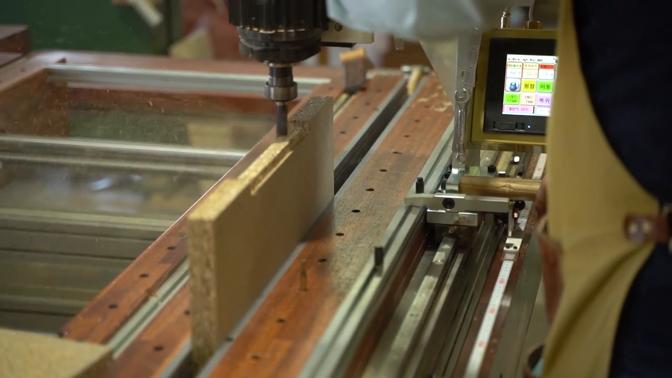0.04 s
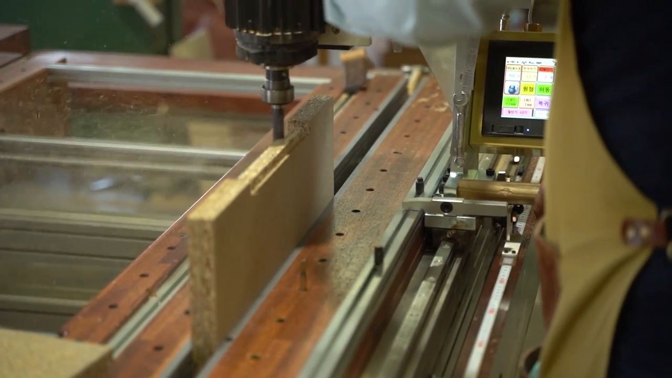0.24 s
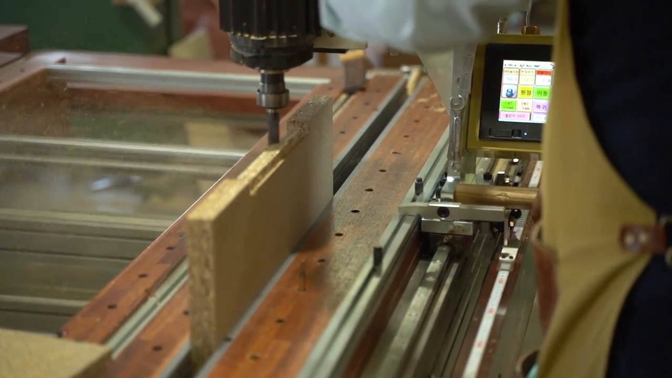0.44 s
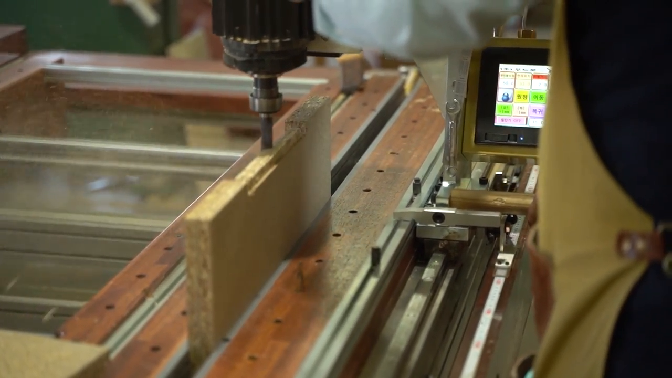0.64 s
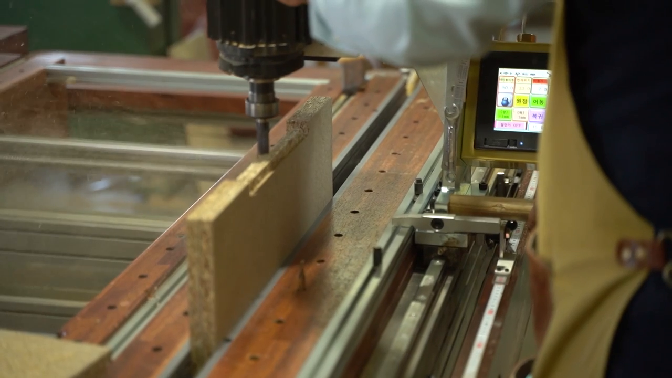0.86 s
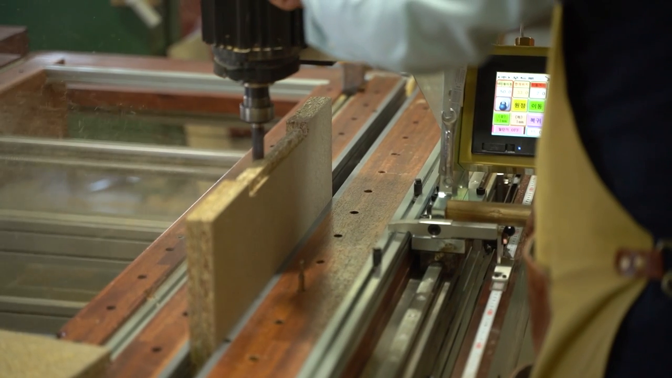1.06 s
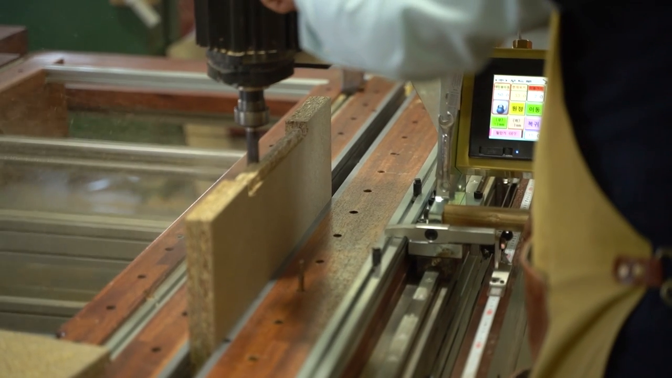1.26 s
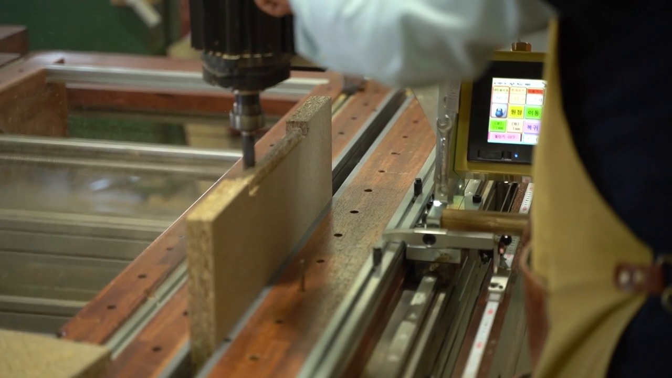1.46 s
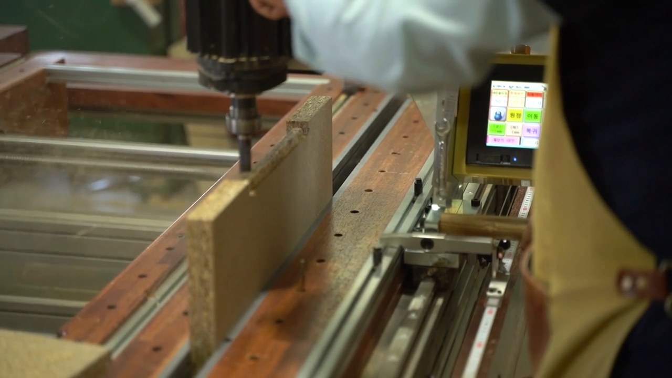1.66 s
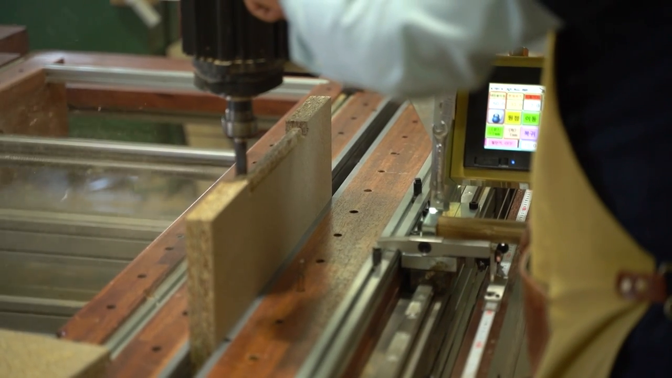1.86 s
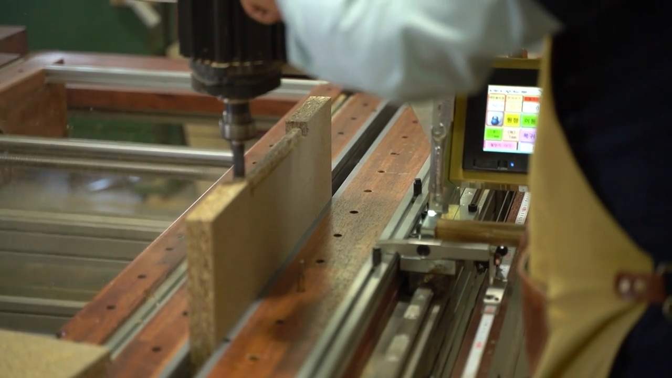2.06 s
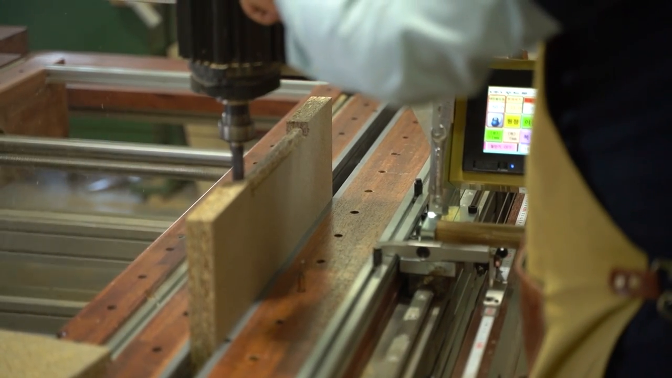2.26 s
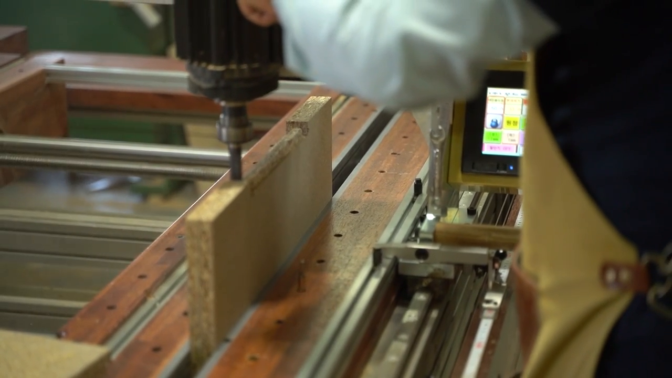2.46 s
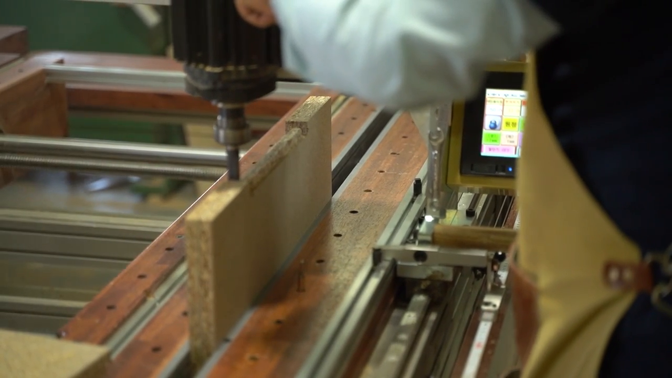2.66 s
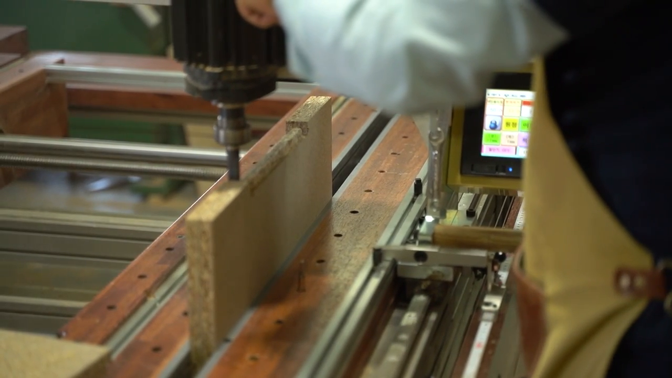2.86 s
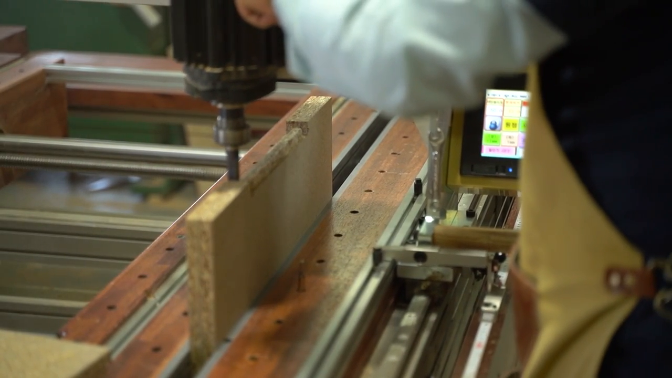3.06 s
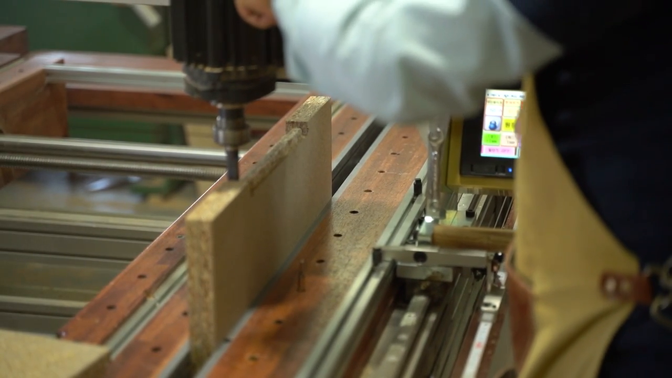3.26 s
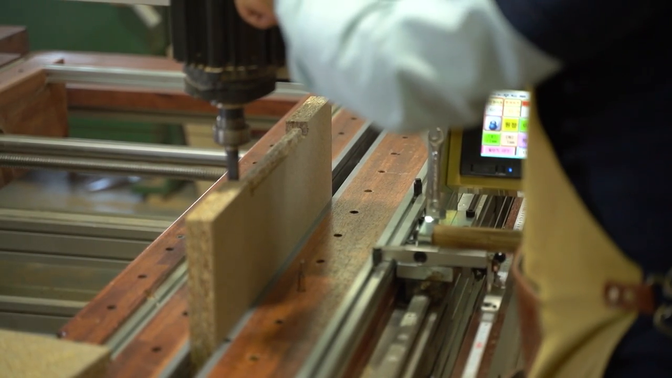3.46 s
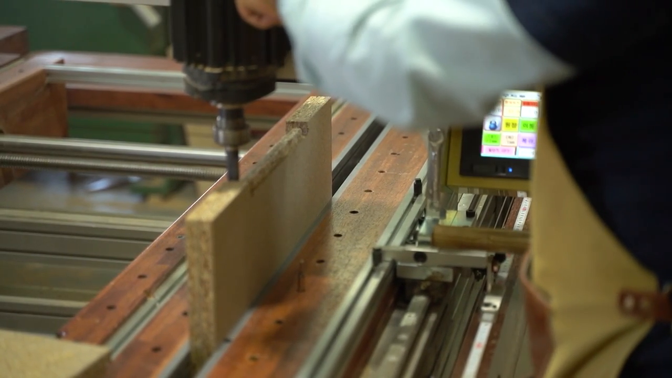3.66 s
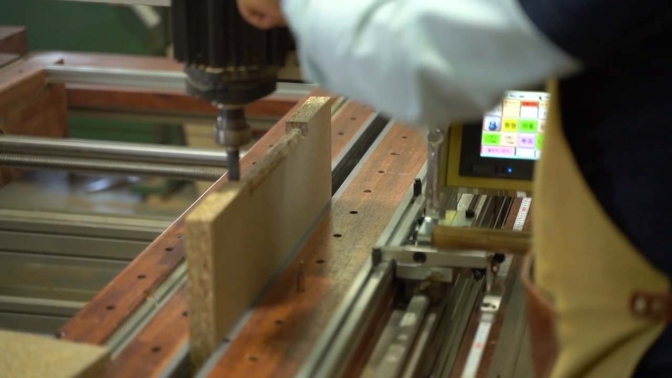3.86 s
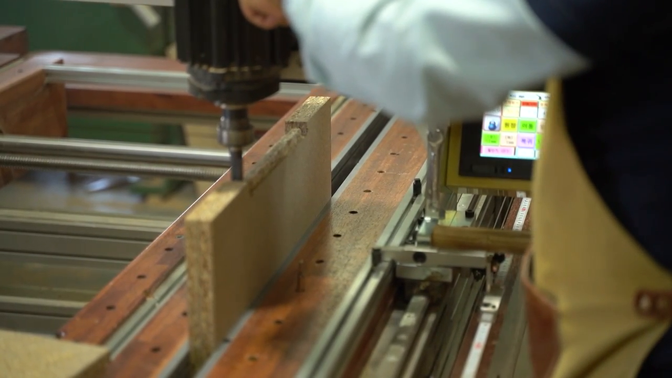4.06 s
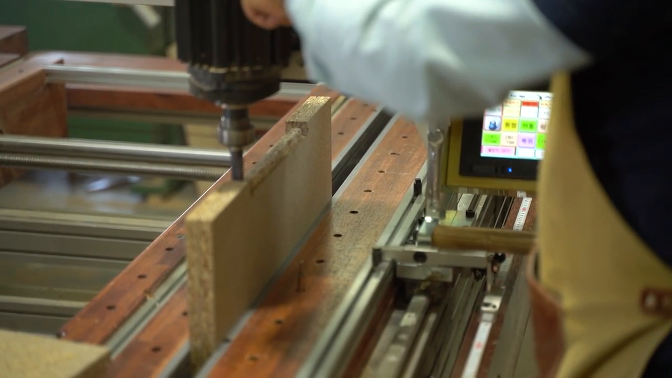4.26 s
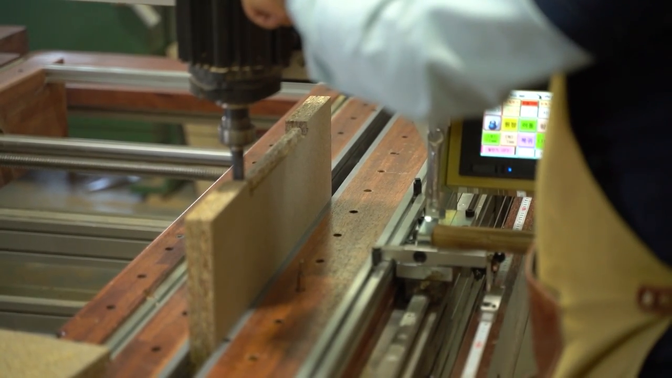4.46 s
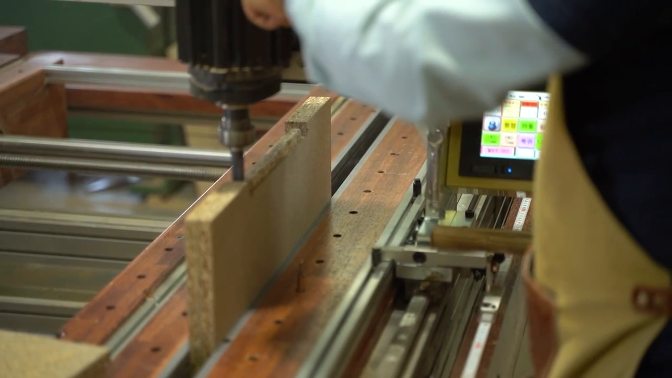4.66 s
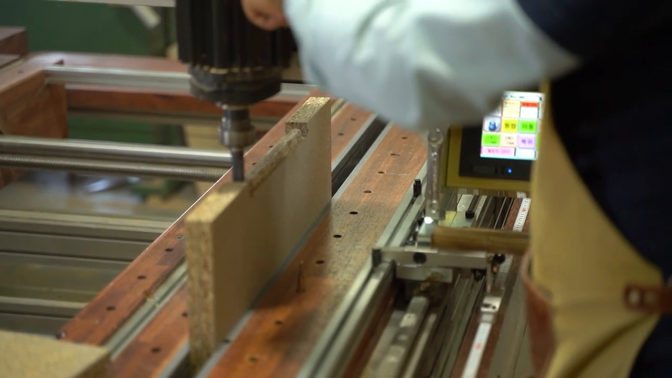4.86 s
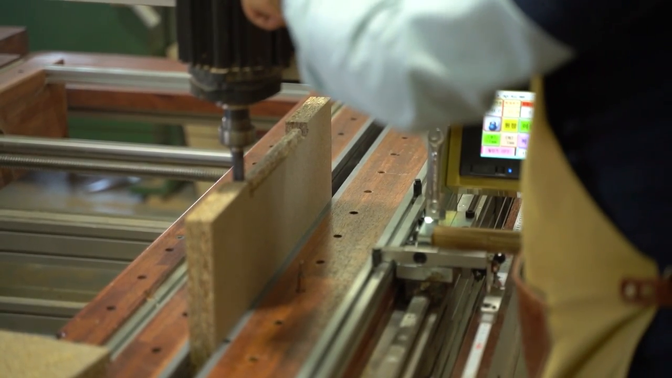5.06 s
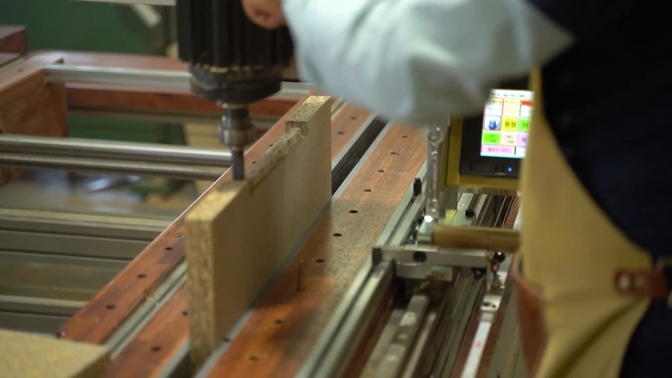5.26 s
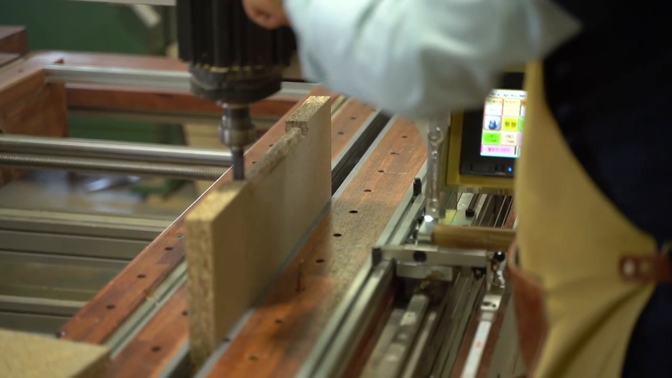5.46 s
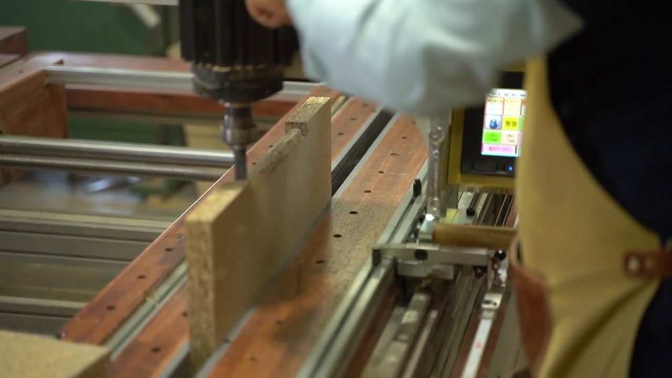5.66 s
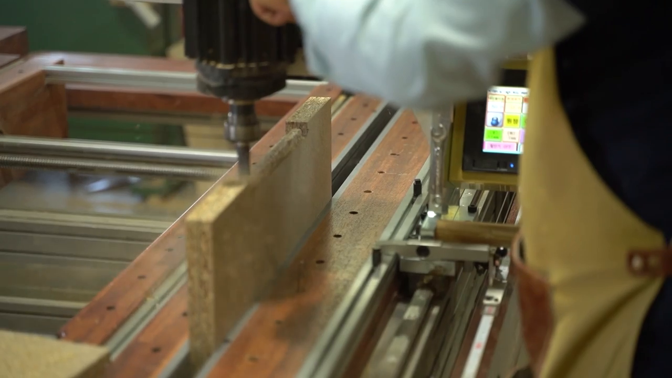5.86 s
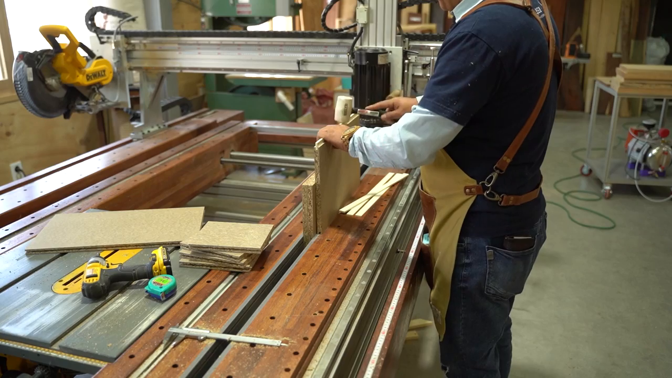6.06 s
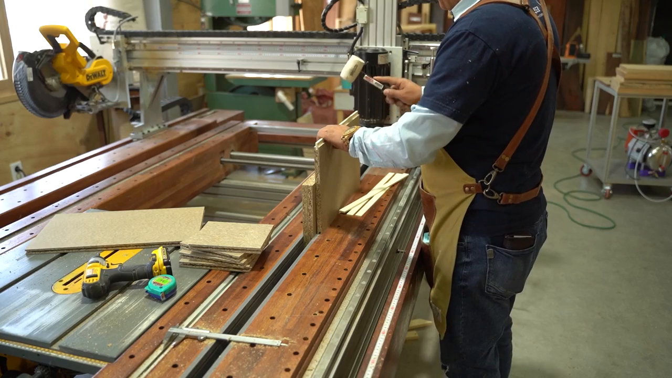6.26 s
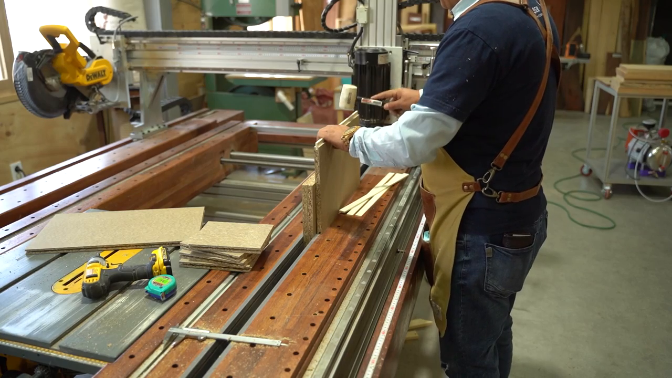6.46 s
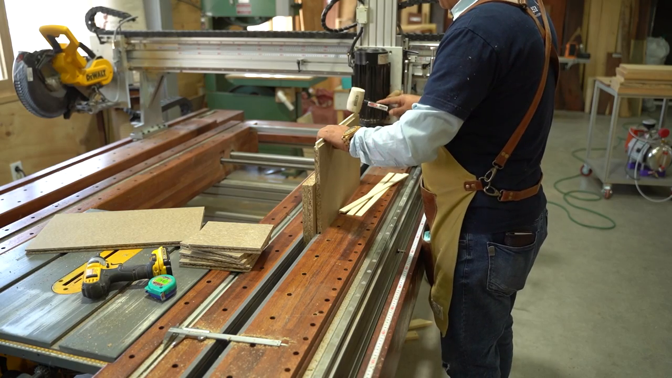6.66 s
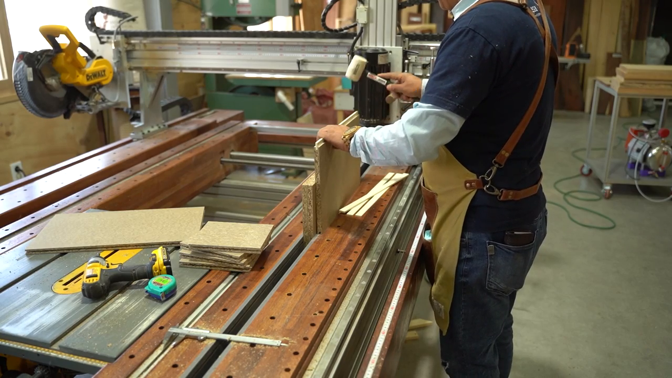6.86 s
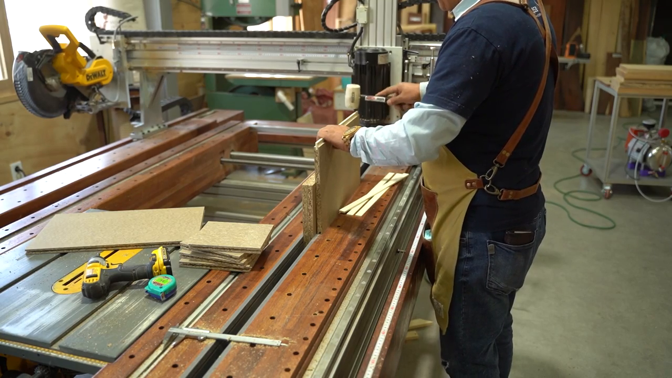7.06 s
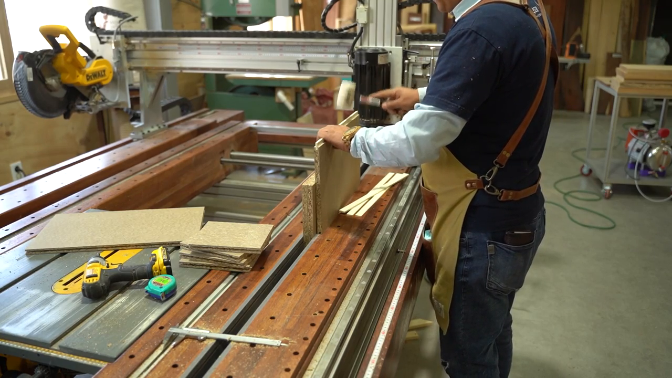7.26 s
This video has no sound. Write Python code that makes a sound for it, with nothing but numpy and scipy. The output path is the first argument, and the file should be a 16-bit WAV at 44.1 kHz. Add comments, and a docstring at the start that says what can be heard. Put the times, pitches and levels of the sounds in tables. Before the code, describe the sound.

A router whines with rushing air as it cuts a board, then a mallet knocks four times on a wooden panel in a quiet workshop.

```python
"""A router cutter whines through a board, close to a stereo pair of microphones in a workshop.
Its four contacts a turn make the whine; the motor sings at multiples of its speed; air rushes from the fan.
After six seconds the scene breaks off. In the same shop, now quiet, an earlier knock dies away,
then a mallet knocks four times on an upright wooden panel: a crack, ringing modes, a short room tail."""
import sys
import numpy as np
from scipy import signal
from scipy.io import wavfile

SR = 44100
rng = np.random.default_rng(int(sys.argv[2]) if len(sys.argv) > 2 else 0)


def dump(signal):
    """Clip the signal to [-1, 1] and save it as 16-bit WAV at the path in sys.argv[1]."""
    limited = np.clip(np.atleast_2d(signal).T, -1, 1)
    pcm = np.round(limited * 32767).astype(np.int16)
    wavfile.write(sys.argv[1], SR, pcm)


N = 322371
T = np.arange(N) / SR
COARSE = np.arange(0, N, 40)
EARS = np.array([[1], [-1]])   # left, right
BREAK_S = 6.012

# Spindle speed, a little lower under load: time_s, turns_hz
SPEED = [(0, 297.3), (1.5, 297.4), (2.0, 297.7), (2.8, 298.7), (3.9, 298.8), (4.1, 298.4), (5.3, 298.7),
         (5.6, 297.9), (6.02, 297.0)]
# The motor's song at six times the spindle speed: time_s, level_db
MOTOR_SONG = [(0, -48), (.6, -47.5), (1.0, -46), (1.5, -57), (1.9, -46), (2.6, -47.5), (2.8, -40),
              (3.2, -44), (3.95, -39.5), (4.08, -45.5), (4.35, -40.5), (4.6, -39.5), (5.1, -39.5),
              (5.48, -39.5), (5.6, -47), (6.0, -54.5)]
# Spindle orders that come and go: order, start_s, end_s, level_db
ORDER_SWELLS = [(3, -0.5, 1.67, -54), (3, 4.0, 4.15, -49.5), (3, 4, 5.85, -56), (5, 0, 1.05, -47),
                (5, 3, 2.4, -55), (10, 1.5, 4.0, -54), (10, 4.2, 4.1, -52)]
def spindle(groove, graze):
    """The router, close by: motor orders, unbalance once a turn, and the cutter on a jittering turn."""
    (turns_hz,), (motor_db,) = in_time(SPEED), in_time(MOTOR_SONG)
    jittery = 2 * np.pi * np.cumsum(turns_hz + 0.447 * drift(13.73)) / SR
    steady = 2 * np.pi * np.cumsum(turns_hz) / SR
    unbalance_db = -65 + 6 * groove
    out = tone(6 * steady, 1400, from_db(motor_db), rough=0.23, flutter_hz=18)
    out += tone(steady, 298, from_db(unbalance_db), rough=0.094, flutter_hz=12)
    for order in sorted({row[0] for row in ORDER_SWELLS}):
        gain = sum(from_db(db) * span(start, end) for k, start, end, db in ORDER_SWELLS if k == order)
        out += tone(order * steady, 298 * order, gain, rough=0.48, flutter_hz=6.9)
    return out + cutter(jittery, groove, graze)


# Whine at the board: order (rounded for the pitch), groove_db, graze_db
WHINE = [(4.2, -41.5, -45), (7.8, -41, -55), (12.3, -43, -37), (15.9, -44.5, -52), (20, -48.5, -46),
         (24, -47.5, -56), (28, -52, -47), (32, -60, -69), (36, -67, -73), (40, -60.5, -69), (44, -63, -67),
         (48, -64, -72)]
# Slow swells in the groove: time_s, order4_db, order8_db, order12_db, order16_db, order20_db
WHINE_SWELLS = [(0, 5, 6, -4, -9, -3), (.2, 2, 3.5, 3.5, 4.5, -1), (.4, 2, -1, -1.5, -3, -2),
                (.6, -4.5, -4, -0.5, -1, 3.5), (.75, -7, 4, -4, -3, 1), (.95, -5, -2, -2.5, 0, 1),
                (1.1, -5, -7, -6.5, 5.5, 6), (1.3, -3, -1.5, -5, -0.5, 2), (1.55, 3, 4.5, -3.5, -5, -3),
                (1.7, 3.5, -4, -7, -7, 0), (1.9, 5.5, -1, -3, -4, -1), (2.1, -2, -1.5, 0, -5, -8),
                (2.32, -2.5, 2, -5.5, -3, 5.5), (2.6, -9.5, -5, 3.5, 0.5, 0), (5.6, -4.5, -6, -5, 6.5, 6),
                (5.72, 0, 0, 1, 1, 1), (5.78, -8, -7, 1, 8, 9), (5.84, 2, -5.5, 5, -2, 7),
                (6.0, 4.5, -2, 1, 1, 0)]
def cutter(turn, groove, graze):
    """Four contacts a turn give wavering orders, rougher higher up; a free cutter hardly whines."""
    out, free = 0, 1 - groove - graze
    swells_db = in_time(WHINE_SWELLS) + [0] * len(WHINE)
    for (order, groove_db, graze_db), swell_db in zip(WHINE, swells_db):
        in_wood = groove * from_db(groove_db + swell_db) + graze * from_db(graze_db)
        gain = (in_wood + free * from_db(groove_db - 14)) * from_db(2.3 * drift(7.5))
        out += tone(round(order) * turn, 298 * order, gain,
                    rough=.08 + .014 * order, flutter_hz=30 + 1.5 * order)
    return out


# Cutter in the wood: start_s, enter_s, end_s, leave_s, depth (0-1), grazing (0 or 1)
PASSES = [(-1, .05, 2.7, .08, 1, 0), (4.013, .012, 4.14, .1, 1, 1), (4.34, .03, 4.52, .36, .8, 1),
          (5.52, .1, 7, .05, 1, 0)]
def cutter_contact():
    """How deep the cutter sits in the groove and how hard it grazes the edge, both 0-1."""
    grip = np.zeros((2, N))
    for start, enter, end, leave, depth, grazing in PASSES:
        grip[grazing] += depth * span(start, end, enter, leave)
    return grip


# Tones beside the whine: pitch_hz, start_s, end_s, level_db, flutter_hz
FEED_TONES = [(148, 0, 0.28, -63, 6), (312, 0.31, 1.31, -53.5, 12), (214, 1.1, 2.22, -68, 8.3),
              (2570, 0.49, 2.35, -114, 1.7), (3878, .3, 1.5, -54, 7.5), (2082, 0.89, 2.6, -66.5, 3)]
def feed():
    """Tones of steady pitch swell and fade during the first pass."""
    return sum(tone(2 * np.pi * hz * T, hz, from_db(db) * span(start, end), 0.37, flutter_hz)
               for hz, start, end, db, flutter_hz in FEED_TONES)


# Colour of the air, cutting and running free: frequency_hz, relative_db
RUSH_IN_WOOD = [(20, -36), (60, -37.5), (150, -25), (300, -21), (500, -15.5), (650, -11.5), (1100, -6.5),
                (1800, -3.5), (3000, -6.5), (4300, -3), (5400, -13), (7500, -6), (9500, -38), (12000, -26),
                (16000, -36)]
RUSH_FREE = [(20, -45), (60, -29.5), (150, -35), (300, -20.5), (500, -16.5), (650, -14.5), (1100, -7.5),
             (1800, -4.5), (3000, -7), (5000, -9.5), (7500, -10.5), (9500, -21.5), (12000, -62), (16000, 5)]
# Resonances of the fan duct: pitch_hz, width_hz, level_db
FAN_DUCT = [(673.3, 76, -46), (579, 20, -68)]
# How alike the router is at the two microphones: frequency_hz, likeness (0-1)
ROUTER_LIKENESS = [(60, 1.0), (150, 1.0), (380, 0.98), (950, 0.68), (1500, 0.5), (2380, 0.095),
                   (4500, 0.18), (8500, 0.44), (15000, 0.22)]
# Its lean between them: frequency_hz, left_over_right_db
ROUTER_BALANCE = [(60, 0), (150, -0.5), (380, 0), (950, .5), (2380, 0.5), (5000, 1.1), (8500, 2),
                  (15000, 2.7)]
def fan_rush(cutting):
    """Patchy air noise; it grows, changes colour and resounds more in the duct as the cutter comes free."""
    first_end, second_start = PASSES[0][2], PASSES[1][0]
    groove_opening = 0.7 * T / first_end * (2 * T < first_end + second_start)   # first pass only
    opened = 1 - cutting * (1 - groove_opening)
    opened = np.interp(T - 0.034, T, opened)   # the air follows the cutter a little late
    free_share = 0.17 + 0.4 * opened
    out, shared_db = 0, 0.5 * drift(7.9)
    for hz, band in bands(ROUTER_LIKENESS, N):
        colour_db = (1 - free_share) * at_hz(RUSH_IN_WOOD, hz) + free_share * at_hz(RUSH_FREE, hz)
        out += from_db(colour_db + shared_db + 0.27 * drift(60)) * pan(at_hz(ROUTER_BALANCE, hz)) * band
    out = from_db(-35.5 + 4 * opened) * rms_one(out)
    for hz, width_hz, db in FAN_DUCT:
        air = rng.standard_normal(N) + 0.19 * rng.standard_normal((2, N))
        out += from_db(db) * (0.21 + 0.85 * free_share) * narrow(air, hz, width_hz)
    return out


# Blows near the microphones, the first before the break: start_s, strength_db, crack_db, thud_db, pan_db
KNOCKS = [(5.79, -8.5, 8.5, -3, 0), (6.1003, -8.5, 7, -2, 0.5), (6.3990, -12, 9.5, 2, 0.5),
          (6.7220, -14.5, 15.5, 6.5, 0.5), (7.0400, -8.5, 8, 1.5, 0.5)]
# Modes of the wooden panel: pitch_hz, relative_db, t60_s
PANEL_MODES = [(102, -16, 0.072), (125, -6.5, 0.11), (179, 2, 0.021), (226, -9.5, 0.11), (268, -8, 0.055),
               (375, -2.5, 0.051), (469, 0.5, 0.021), (545, -4.5, 0.031), (639, -10, 0.055),
               (752, -12.5, 0.039), (854, -4, 0.037), (984, 4, 0.007), (1156, -7.5, 0.034),
               (1270, -1.5, 0.016), (1480, -6, 0.024), (1610, -37, 0.01), (1980, -14, 0.021)]
# Mallet head, dowel and first echoes: delay_s, relative_db
CONTACTS = [(.0005, -21), (.0014, -3.5), (.0021, 2), (.0031, -14), (.0037, -5), (.0050, -10), (.0098, -14),
            (0.014, -12), (.019, -11)]
def mallet_knocks():
    """Each blow rings the panel under a few sharp contacts; returns the near sound and the room's share."""
    near, to_room, t = np.zeros((2, N)), np.zeros(N), np.arange(SR // 4) / SR
    for start, strength_db, crack_db, thud_db, pan_db in KNOCKS:
        body = 0
        for k, (hz, db, t60) in enumerate(PANEL_MODES):
            mode_db = db - 8.5 + 2 * rng.standard_normal() + thud_db * (hz < 700)
            body += (-1) ** k * from_db(mode_db - 60 * t / t60) * np.sin(2 * np.pi * hz * t)
        body *= 1 - .5 * np.exp(-t / 0.0017)   # the panel takes a moment to swing up
        clicks = 0.068 * rng.standard_normal(len(t)) * from_db(-60 * t / 0.013) * np.minimum(t / 0.0031, 1)
        for delay, db in CONTACTS:
            clicks[round(delay * SR)] += from_db(db + 2 * rng.standard_normal()) * rng.choice([-1, 1])
        at, strength, sharp = round(start * SR), from_db(strength_db), from_db(crack_db)
        near[:, at:at + len(t)] += strength * pan(pan_db) * (body + sharp * crack(clicks))
        to_room[at:at + len(t)] += strength * (body + 1.68 * sharp * crack(t == 0))
    low_cut = signal.butter(4, 75, "high", fs=SR, output="sos")
    return signal.sosfilt(low_cut, near), signal.sosfilt(low_cut, to_room)


# Broad peaks of the mallet's face: frequency_hz, gain_db
MALLET_FACE = [(1500, 4), (2500, 4.5), (3800, 1.5), (5500, -46), (8200, -23), (11000, -29), (15000, -16)]
def crack(clicks):
    """The mallet's face colours the sharp contacts, rolled off at the top."""
    bright = sum(from_db(db) * (-1) ** k * resonance(clicks, hz, 0.47 * hz)
                 for k, (hz, db) in enumerate(MALLET_FACE))
    return signal.sosfilt(signal.butter(2, 9000, fs=SR, output="sos"), bright)


# Decay of the workshop: frequency_hz, t60_s
SHOP_DECAY = [(60, 0.64), (130, 0.29), (300, 0.47), (700, 0.46), (1500, 0.53), (3000, 0.47), (6000, 0.32),
              (12000, 0.2)]
# Colour coming back from its walls: frequency_hz, relative_db
SHOP_COLOUR = [(60, -17), (200, -2.5), (600, 8), (1500, -1), (4000, -6.5), (9000, 6.5), (15000, -18)]
# How alike the room is at the two microphones: frequency_hz, likeness (0-1)
SHOP_LIKENESS = [(60, 0.99), (180, 1), (550, 0.9), (1650, 0.16), (4970, 0.034), (15000, 0.15)]
def shop_reverb(sound):
    """The room fills in a few ms and dies band by band, with a weaker, slower tail from its far end."""
    t, tail = np.arange(SR) / SR, 0
    for hz, band in bands(SHOP_LIKENESS, SR):
        fall_db = -60 * t / at_hz(SHOP_DECAY, hz)
        far_end = from_db(-14 + fall_db / 1.97)
        tail += from_db(at_hz(SHOP_COLOUR, hz)) * (from_db(fall_db) + far_end) * band
    tail *= 1 - np.exp(-(t / 0.0036) ** 2)
    gain = from_db(-29) * pan(0.3)   # the nearer wall is on the left
    return gain * signal.fftconvolve(tail, sound[None], axes=1)[:, :N]


# Room tone all around the microphones: frequency_hz, relative_db
ROOM_TONE = [(25, -12), (50, -14), (100, 0.5), (300, -13), (1000, -14), (4000, -38), (15900, -48.5)]
def quiet_shop():
    """Low rumble, faint hiss and a wavering hum."""
    size = N - round((BREAK_S - .5) * SR)
    hush = rms_one(sum(from_db(at_hz(ROOM_TONE, hz)) * band for hz, band in bands(SHOP_LIKENESS, size)))
    hum = narrow(rng.standard_normal(size), hz=372, width_hz=35)
    return np.pad(from_db(-51) * hush + from_db(-53) * hum, ((0, 0), (N - size, 0)))


def tone(phase, image_hz, gain, rough, flutter_hz):
    """A sine fluttering with narrow noise, placed in stereo as the router is at image_hz."""
    unlike = np.sqrt(1 - np.clip(at_hz(ROUTER_LIKENESS, image_hz), 0, 1))
    apart = np.exp(.4j * unlike * chance(1.5) * EARS)
    swing, slip = (chance(flutter_hz) + 1.3 * unlike * chance(flutter_hz) * EARS for _ in range(2))
    flutter = (1 + rough * (swing + 1j * slip)) * apart * pan(at_hz(ROUTER_BALANCE, image_hz))
    carrier = np.sqrt(2 / (1 + 2 * rough ** 2)) * gain * np.exp(1j * phase)
    return np.array([(np.interp(np.arange(N), COARSE, ear) * carrier).imag for ear in flutter])


def bands(likeness, size):
    """Narrow bands of stereo noise, as (centre Hz, left and right)."""
    edges, white = 35 * 2 ** np.arange(0, 9.1, .4), rng.standard_normal((2, 2, size))
    for k, (low, high) in enumerate(zip(edges, edges[1:])):
        band_pass = signal.butter(2, [low, high], "band", fs=SR, output="sos")
        mid, side = signal.sosfilt(band_pass, white[k % 2])
        hz = np.sqrt(low * high)
        alike = np.clip(at_hz(likeness, hz), -1, 1)
        yield hz, np.sqrt(1 + alike) * mid + np.sqrt(1 - alike) * side * EARS


def resonance(x, hz, width_hz):
    """Two-pole peak of gain 1."""
    r = np.exp(-np.pi * width_hz / SR)
    poles = [1, -2 * r * np.cos(2 * np.pi * hz / SR), r * r]
    return signal.lfilter(np.array([1, 0, -1]) * (1 - r * r) / 2, poles, x)


def narrow(noise, hz, width_hz):
    """Noise twice through one resonance, at rms 1."""
    return rms_one(resonance(resonance(noise, hz, width_hz), hz, width_hz))


def chance(rate_hz):
    """Slow low-passed noise at every 40th sample, at rms 1."""
    r = np.exp(-80 * np.pi * rate_hz / SR)
    return rms_one(signal.lfilter([1], [1, -2 * r, r * r], rng.standard_normal(len(COARSE) + 2000))[2000:])


def drift(rate_hz):
    """Slow chance, one value a sample."""
    return np.interp(np.arange(N), COARSE, chance(rate_hz))


def span(start, end, rise_s=0.14, fall_s=0.14):
    """Rises around the start and falls around the end, 0-1."""
    return np.clip(np.minimum((T - start) / rise_s, (end - T) / fall_s) + .5, 0, 1)


def in_time(rows):
    """Columns of a curve table, one value a sample."""
    times, *columns = np.transpose(rows)
    return [np.interp(T, times, column) for column in columns]


def at_hz(points, hz):
    """Read a table on a log-frequency axis."""
    frequencies, values = np.transpose(points)
    return np.interp(np.log(hz), np.log(frequencies), values)


def pan(left_over_right_db):
    """Left and right gains."""
    return from_db(left_over_right_db / 2 * EARS)


def from_db(db):
    """Decibels to gain."""
    return 10 ** (np.asarray(db) / 20)


def rms_one(x):
    """Scale to rms 1."""
    return x / np.sqrt(np.mean(x ** 2) + 1e-20)


def scene():
    """Milling until the break, then the mallet in the quiet shop."""
    after = np.clip((T - BREAK_S) / .001, 0, 1)
    groove, graze = cutter_contact()
    near, to_room = mallet_knocks()
    cutting = groove + graze ** 4   # a shallow graze hardly hushes the air
    milling = spindle(groove, graze) + feed() + fan_rush(cutting)
    knocking = near + shop_reverb(to_room) + quiet_shop()
    return (1 - after) * milling + after * knocking


def record(dry):
    """A steep low-pass cuts the top above about 16 kHz."""
    return signal.sosfilt(signal.cheby2(20, 70, 15950, fs=SR, output="sos"), dry)


dry = scene()
out = record(dry)
dump(out)
```